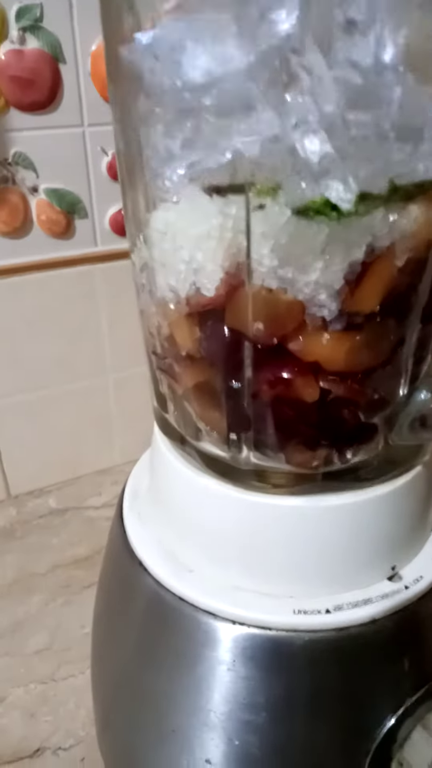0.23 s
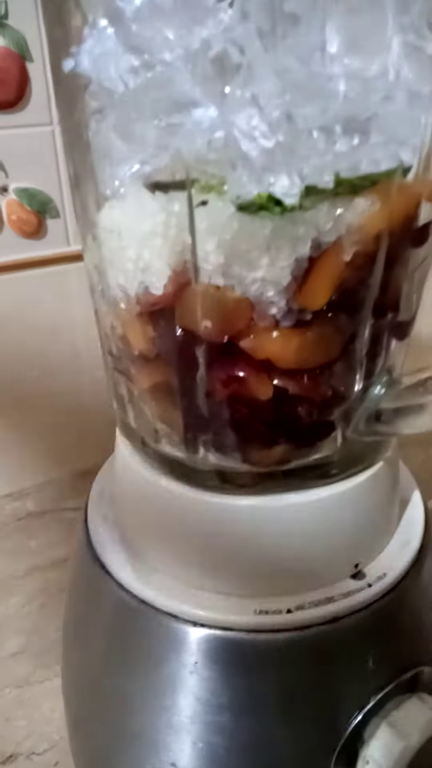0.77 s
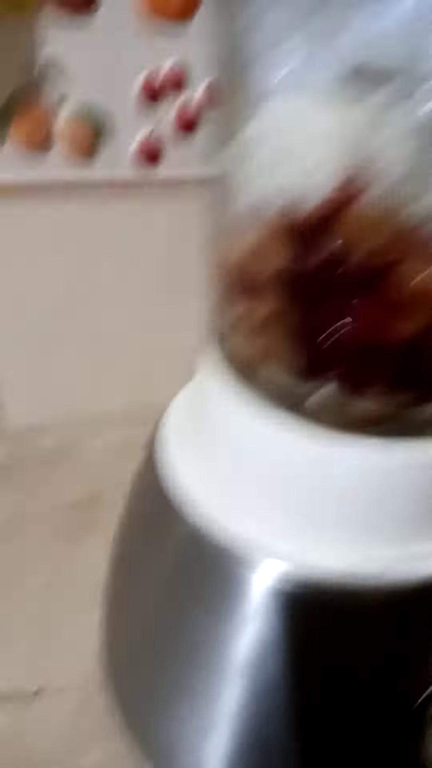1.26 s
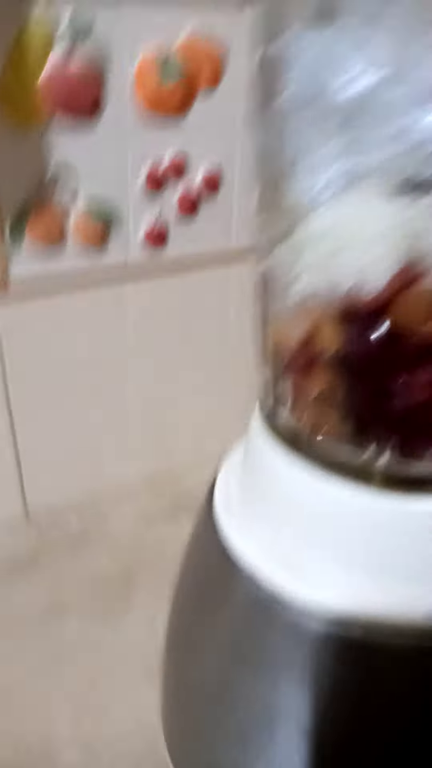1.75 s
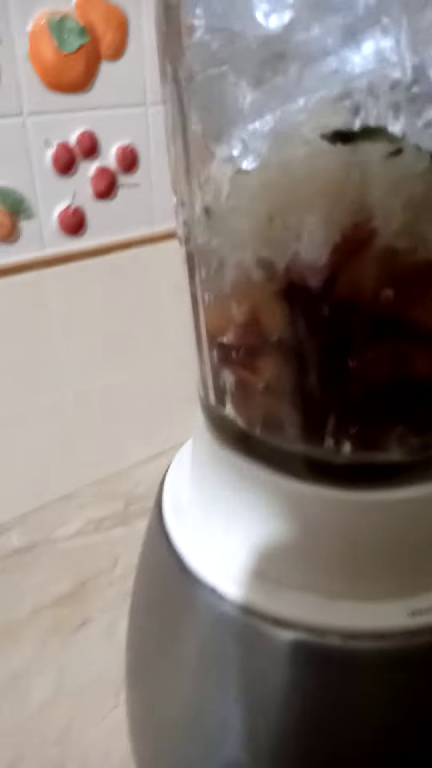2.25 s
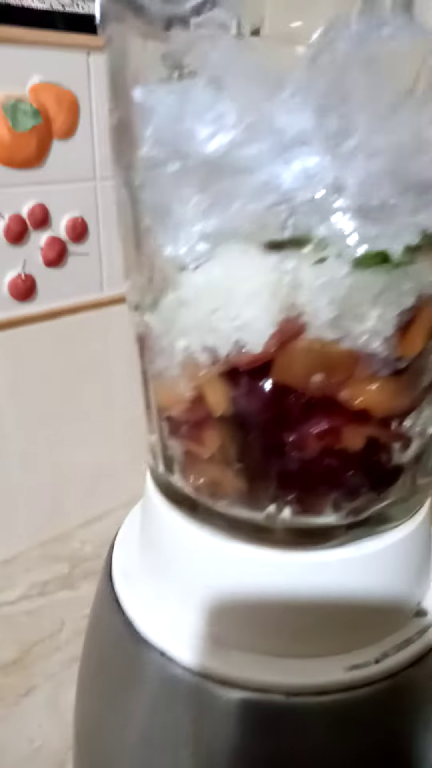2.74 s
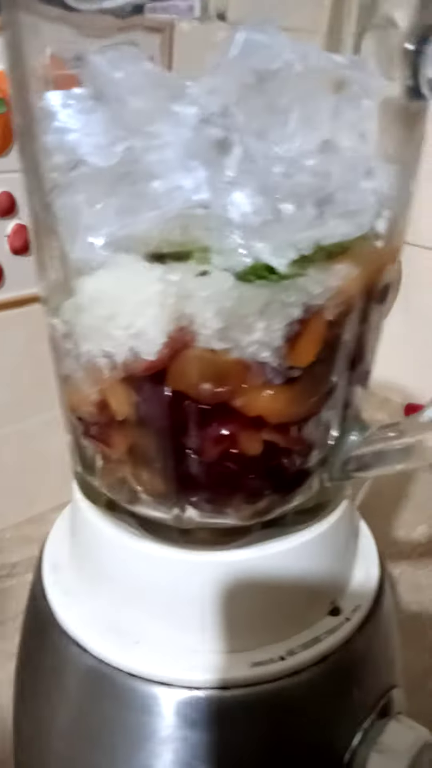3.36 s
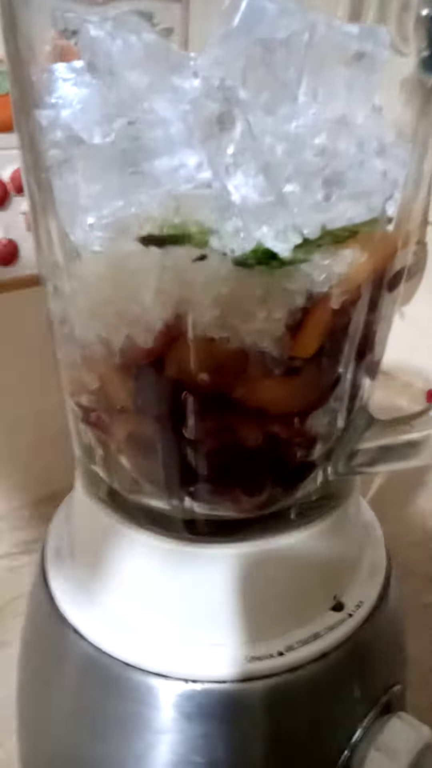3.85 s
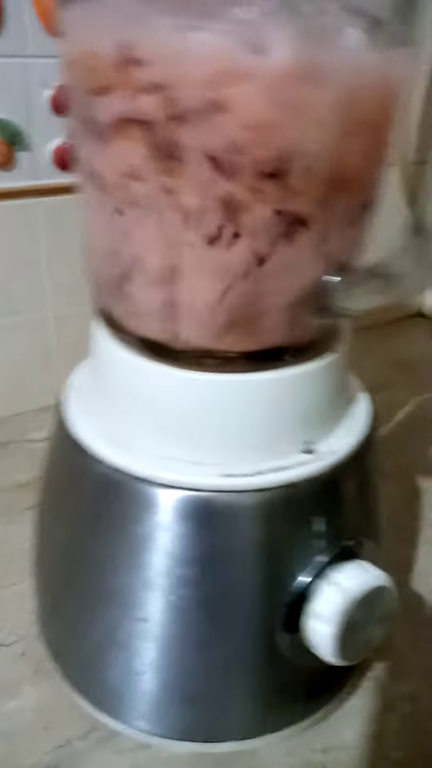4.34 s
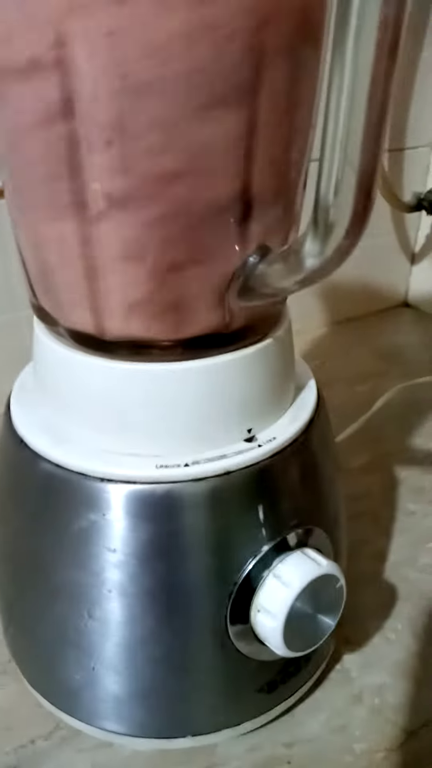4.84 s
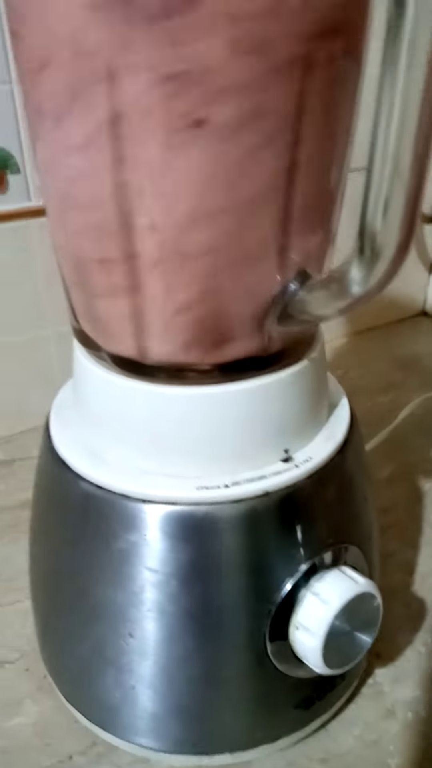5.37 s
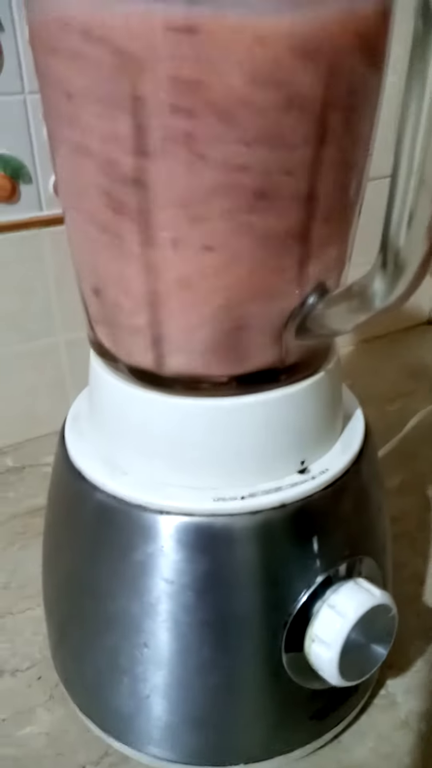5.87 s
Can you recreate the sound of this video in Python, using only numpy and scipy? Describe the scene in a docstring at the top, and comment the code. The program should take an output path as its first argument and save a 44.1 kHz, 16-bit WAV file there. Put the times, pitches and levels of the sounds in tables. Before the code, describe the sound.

A close microphone catches a short rush of ice against glass, a quiet pause, then one hard knock and a run of irregular clunks with cube rattle. A sharp double clack seats the jar and the glass rings briefly. Ice ticks settle. After a blink of total silence the blender roars steadily, a low motor hum under wet slush, gritty ice grinding and bright spray, with hard tiled-room reflections.

```python
"""A blender is loaded, closed and run in a tiled kitchen, close up. Ice slides and rattles into its glass jar
as dense and single contacts; knocks on the jar thud, crack and ring the glass, ending with one sharp clack
as it seats, then the cubes settle. After a short silent pause the blender runs: filtered grains are ice
ground into slush, sine orders of the shaft are the motor's hum. A quiet room and appliance hum lie beneath."""
import sys
import numpy as np
from scipy import signal
from scipy.fft import rfft, irfft, next_fast_len
from scipy.io import wavfile
from scipy.ndimage import map_coordinates

SR = 44100
rng = np.random.default_rng(int(sys.argv[2]) if len(sys.argv) > 2 else 0)


def dump_mix(stems):
    """Bounce the given channels to the path in sys.argv[1] as a 16-bit WAV at rate SR."""
    frames = np.atleast_2d(stems).T  # one column per channel
    limited = np.clip(frames, -1, 1)  # hard clip at full scale
    pcm = np.round(limited * 32767).astype(np.int16)
    wavfile.write(sys.argv[1], SR, pcm)


N = 269160
TIME = np.arange(N) / SR
AGE = TIME[:SR * 3 // 4]  # time since a blow
START_S = 4.039  # blender on

# ice at the blades: (time [s], grinding level [dB], blade ring level [dB])
LOAD = [(4.06, -30, -48), (4.27, -29, -35), (4.45, -27, -26), (4.52, -27.5, -38), (4.68, -29, -35),
        (4.85, -28, -24), (5.05, -24.5, -29), (5.2, -26, -26.5), (5.43, -24.5, -23.5), (5.49, -28, -28),
        (5.65, -28.5, -26.5), (5.71, -27.5, -45), (5.85, -28.5, -23), (5.97, -25, -27.5)]
# jar and base on the counter, spectrum: (frequency [Hz], level [dB])
THUD_SPECTRUM = [(50, -63.5), (80, -26.5), (129, -39.5), (168, -14.5), (257, -20.5), (380, -10), (531, -15),
                 (765, -11.5), (1080, 1.5), (1350, -6.5), (1730, -11), (1910, -16.5), (2090, -29),
                 (2250, -23), (2600, -44), (5720, -92.5)]
# hard contact, spectrum: (frequency [Hz], level [dB])
CRACK_SPECTRUM = [(1060, -32.5), (1800, 1.5), (3060, -5), (3410, 5), (4140, -7.5), (5910, -9.5),
                  (6470, 1.5), (7560, -17), (9080, -6.5), (13000, -26.5), (16000, -21)]
# snap of a tiny contact, spectrum: (frequency [Hz], level [dB])
CLICK_SPECTRUM = [(240, -63.5), (400, -18), (1900, -17.5), (2590, -8), (3420, -2), (6240, 3.5),
                  (8110, -6.5), (12700, -12.5), (15000, -6.5)]

TICK_T60_S = 0.0041  # first instant of a contact
THUMP_DB, THUMP_HZ, THUMP_WIDTH_HZ = -21, 177, 90  # a jar that is not held passes its blow to the counter
SLIDE_ATTACK_S, SLIDE_FALL_DB_PER_S = 0.017, 190


def blending():
    """Blades shatter ice grains, ring with them and throw spray; slush churns around an air funnel."""
    # lumps passing the blades: (time [s], length [s], churn swell [dB], crunch level [dB], gulp pitch [Hz])
    lump_events = [(4.311, 0.029, -40, -31, 900), (4.714, 0.017, -26, -23.5, 1060),
                   (5.377, 0.058, -32, -35, 770), (6.033, 0.024, -29.5, -37, 910)]
    # air hollows in the vortex: (start [s], length [s], top pitch before waver [Hz], level [dB])
    slurp_events = [(4.061, .3, 489, -41.5), (4.24, 0.2, 914, -39), (4.797, 0.6, 867, -40),
                    (5.068, 0.33, 1265, -42), (5.91, 0.15, 497.5, -39.5)]
    # slush spectrum: (frequency [Hz], level [dB])
    churn_spectrum = [(350, -29.5), (600, 1.5), (667, -8.5), (895, 1.5), (1080, 7), (1160, -1), (1480, 6.5),
                      (1800, -0.5), (2340, -47), (3960, -120)]
    # shattering ice spectrum: (frequency [Hz], level [dB])
    grind_spectrum = [(1000, -60.5), (1700, -9), (2500, -3.5), (2880, -3), (3170, -5.5), (3680, -7.5),
                      (4210, -6), (4580, -8), (6460, -11), (7200, -18.5), (9360, -20), (15800, -120)]
    # spray spectrum: (frequency [Hz], level [dB])
    spray_spectrum = [(4000, -21), (6800, 2.5), (7540, -11), (8190, -1.5), (9390, -1.5), (10800, -8),
                      (12700, -9.5), (13700, -10), (15100, -2.5), (16000, -8)]
    # blade resonances: (frequency [Hz], width [Hz], level [dB])
    blade_modes = [(2786, 74, 5.5), (2940, 31, 12), (3180, 360, -1)]
    grind_db, spray_db = -23, -33  # at mean load
    churn_db = -34  # between lumps
    lump_attack_s, lump_fall_db_per_s = 0.014, 260

    level_db, ring_db = curves(LOAD)
    load_db = level_db - level_db[TIME > START_S].mean()
    flutter_db = .5 * wobble(35)
    slush, shards, strikes, drops = (grains(rate, spread_db=1.5) for rate in (4000, 14000, 5000, 10000))

    # lumps add power to the churn
    lump_power = sum(amp(2 * db) * swell(s, length, lump_attack_s, lump_fall_db_per_s) ** 2
                     for s, length, db, *_ in lump_events)
    churn_gain = np.sqrt(amp(2 * churn_db) + lump_power)
    churn = churn_gain * patchy(kitchen(colour(slush, churn_spectrum), wet_db=-2.5), depth_db=1.9)
    grind_texture = patchy(kitchen(colour(shards, grind_spectrum), wet_db=-4.5), depth_db=1.1)
    grind = amp(grind_db + load_db + flutter_db) * grind_texture
    ring = amp(ring_db) * unit(resonate(strikes, blade_modes))
    # spray follows half the load in dB
    spray_texture = unit(kitchen(colour(drops, spray_spectrum), wet_db=-1.0))
    spray = amp(spray_db + .5 * load_db + flutter_db) * spray_texture
    slurp = sum(amp(db) * arch(s, length, hz) for s, length, hz, db in slurp_events)

    lumps = np.zeros(N)
    for s, length, swell_db, crunch_db, gulp_hz in lump_events:
        # the hollow a lump leaves
        gulp = unit(resonate(rng.standard_normal(N), [(gulp_hz, 94, 0)]))
        lumps += amp(swell_db - 1) * swell(s, length, lump_attack_s, lump_fall_db_per_s) * gulp
        crunch = struck(colour(burst(t60=0.22), grind_spectrum))
        body = amp(-3.5) * struck(colour(burst(t60=0.028), churn_spectrum))
        add(lumps, s, amp(crunch_db) * kitchen(crunch + body, wet_db=4))
    return churn + grind + ring + spray + slurp + lumps


def arch(s, length, top_hz):
    """A fluttering, wavering whistle: pitch and level arch as an air hollow opens and closes."""
    bend_hz_per_s2 = 1900
    off = TIME - s - length / 2
    shape = np.sqrt(np.maximum(1 - (2 * off / length) ** 2, 0))
    hz = (top_hz - bend_hz_per_s2 * off ** 2) * (1 + .012 * wobble(14))
    flutter = amp(4 * wobble(45))
    return shape * unit(flutter * np.sin(2 * np.pi * np.cumsum(hz) / SR))


def motor():
    """Sine orders of an unsteady shaft hum and whir; noise through the base and housing drones."""
    # shaft: (time [s], mean rotation [Hz], relative hum level [dB])
    shaft_curve = [(4.05, 202.3, -35), (4.35, 204.5, -42.5), (4.58, 211, -29), (4.9, 196.1, -34),
                   (5.15, 202.8, -49), (5.4, 202.4, -32), (5.8, 202, -50), (6.1, 206, -40)]
    # hum: (multiple of the shaft, relative level [dB])
    hum_orders = [(.5, 1), (1, 17.5), (2, -1)]
    # coupling whir: (multiple of the shaft, mean level [dB])
    whir_orders = [(10, -56), (13, -43.5), (14, -35), (15, -41.5)]
    # housing resonances: (frequency [Hz], width [Hz], level [dB])
    housing_modes = [(213, 32, -13.5), (500, 190, -25.5), (888, 81, -7.5), (1244, 26, -8.5), (1518, 29, -7),
                     (1900, 80, -8.5)]
    # motor base on the counter, spectrum: (frequency [Hz], level [dB])
    drone_spectrum = [(20, -36), (54, -33), (88, -16), (162, -6.5), (271, 0), (334, -15.5), (401, -2),
                      (442, -8.5), (480, -2), (653, -16), (700, -16), (910, -28), (1540, -120)]
    stagger_db = 3.5
    drone_db, drone_rise_db_per_s = -39, 1.5
    drone_follows = 0.29  # dB per dB of the shaft's hum

    shaft_hz, shaft_db = curves(shaft_curve)
    turns = np.cumsum(shaft_hz * (1 + .011 * wobble(22))) / SR
    hum = sum(amp(db + stagger_db * wobble(12)) * np.sin(2 * np.pi * k * turns) for k, db in hum_orders)

    strain_db = drone_follows * shaft_db + drone_rise_db_per_s * TIME
    drone_gain = amp(drone_db + strain_db - strain_db[TIME > START_S].mean())
    drone = drone_gain * patchy(colour(rng.standard_normal(N), drone_spectrum), depth_db=3.5)
    housing = unit(resonate(rng.standard_normal(N), housing_modes))

    # the whir follows half the blade ring in dB
    _, ring_db = curves(LOAD)
    whir = sum(amp(db + stagger_db * wobble(30)) * np.sin(2 * np.pi * k * turns) for k, db in whir_orders)
    whir *= amp(.5 * (ring_db - ring_db[TIME > START_S].mean()))
    return amp(shaft_db - 9.5) * unit(hum) + whir + drone + amp(-33.5) * housing


def knocks():
    """The jar tips against its seat and drops back with a second, weaker contact; held, it also grates."""
    # (time [s], level [dB], hardness [dB], clonk [Hz], gap to the drop back [s], clink of the ice [Hz])
    knock_events = [(1.284, -20, -10.5, 1110, 0.061, 3650), (1.485, -37.5, -36, 1200, 0.012, 3400),
                    (1.503, -33, -27.5, 1320, 0.009, 3500), (1.589, -32, -28, 1170, 0.014, 3520),
                    (1.619, -29.5, -14.5, 1180, 0.016, 3500), (1.69, -24, -15, 1260, 0.016, 3280),
                    (1.789, -25.5, -16.5, 1320, 0.009, 4000), (1.814, -34.5, -25.5, 1100, 0.013, 3500),
                    (1.863, -32, -22, 1260, 0.011, 3650), (1.897, -27, -17, 1090, 0.061, 4000),
                    (1.977, -25, -25.5, 1140, 0.01, 3900), (2.048, -22.5, -14.5, 1350, 0.021, 3950),
                    (2.127, -24.5, -13, 1214, 0.032, 2880), (2.186, -29.5, -15.5, 1170, .022, 3400),
                    (2.256, -24.5, -11.5, 1140, .018, 2800), (2.299, -28, -21.5, 1220, 0.025, 3450),
                    (2.37, -23.5, -12.5, 1197, 0.011, 4530), (2.432, -24, -6, 1160, 0.038, 4560),
                    (2.485, -33.5, -9.5, 1020, 0.009, 3460), (2.513, -25.5, 0.5, 1193, 0.016, 3400)]
    held_from_s, held_to_s = 1.45, 2.7
    out = np.zeros(N)
    for s, db, hard_db, clonk_hz, gap_s, clink_hz in knock_events:
        held = held_from_s < s < held_to_s
        add(out, s, amp(db) * knock(hard_db, clonk_hz, clink_hz, held))
        rebound_db = db - 1.5 - 39 * gap_s  # later is weaker
        add(out, s + gap_s, amp(rebound_db) * knock(hard_db - 5.5, clonk_hz, clink_hz, held))

    # the held jar grates in its seat
    grit = grains(rate=700, spread_db=4)
    grating = unit(colour(grit, THUD_SPECTRUM)) + amp(-29.5) * unit(colour(grit, CRACK_SPECTRUM))
    grating = grating * swell(1.5, 0.84, attack_s=0.076, fall_db_per_s=67.0)
    out += amp(-44.5) * kitchen(grating, wet_db=-3.5)
    return highpass(out, 85)  # too small to radiate deep bass


def knock(hard_db, clonk_hz, clink_hz, held):
    """One contact thuds, clonks, cracks, rings the glass and throws a cube at it; harder is brighter."""
    thud = struck(colour(burst(t60=0.041), THUD_SPECTRUM))
    if not held:
        thud += amp(THUMP_DB) * struck(resonate(burst(t60=0.04), [(THUMP_HZ, THUMP_WIDTH_HZ, 0)]))
    seat = [(clonk_hz, 190, 0)]
    clonk = amp(-2.8) * struck(resonate(resonate(burst(t60=0.019), seat), seat))
    crack = amp(hard_db + 2.5) * struck(colour(burst(t60=0.075), CRACK_SPECTRUM))
    cube = [(clink_hz, 340, 0)]
    clink = amp(hard_db + 1.5) * struck(resonate(resonate(burst(t60=0.036), cube), cube))
    blow = jolt(kitchen(thud + clonk + crack + clink, wet_db=-5.5), rattle_db=-4.5)
    tick = amp(hard_db - 13.5) * struck(colour(burst(t60=TICK_T60_S), CLICK_SPECTRUM))
    ring = glass(-2.5 + 0.29 * hard_db, hard_db - 0.5, held)
    rise = 1 - np.exp(-AGE / .0005)
    return blow + tick + kitchen(rise * ring, wet_db=-7.5)


def jolt(blow, rattle_db):
    """A blow and its weaker repeats, as shaken cubes rattle back against the wall."""
    rattle = grains(rate=230, spread_db=10.0, size=len(AGE)) * amp(-60 * AGE / 0.072) * (AGE > .004)
    rattle /= np.sqrt(np.sum(rattle ** 2) + 1e-9)
    return blow + amp(rattle_db) * signal.fftconvolve(blow, rattle)[:len(AGE)]


def glass(ring_db, hard_db, held=False, seated=False):
    """Decaying mode pairs of the wall; hardness drives the high ones, ice on a held jar detunes them."""
    # (frequency [Hz], level [dB], free t60 [s], extra while held [dB], extra when struck from the seat [dB])
    wall_modes = [(1906, -12, 0.38, 4.5, -6), (2306, -15, 0.3, 9, 7.5), (2850, -7.5, 0.052, 8, 12),
                  (3400, -1, 0.11, 7, -9), (3700, 4.5, 0.18, -3, -0.5), (4410, -13, 0.12, 7.5, 13),
                  (4800, -6.5, 0.051, 7, -16.5), (5490, 4.5, 0.12, 1, -17), (6510, -9.5, 0.11, 0.5, 9),
                  (6420, -3.5, 0.17, -2, 5.5), (7130, -12, 0.07, 9.5, -16), (10400, -16.5, 0.06, 3.5, 3.5)]
    hand_damping = 1.88  # a hand divides t60 by this
    blur_hz = 25
    out = 0
    draws = rng.uniform(-0.82, 1, (len(wall_modes), 2, 3))
    for (hz, db, t60, held_db, seat_db), pair in zip(wall_modes, draws):
        blow_db = np.interp(hz, [4500, 4900], [ring_db, hard_db])
        life_s = t60 / hand_damping if held else t60
        stray_hz, scatter_db = (.018 * hz, 6) if held else (1.8 / life_s, 2)
        # leaning cubes chafe the wall: phase drifts
        blur = held * np.cumsum(rng.standard_normal(len(AGE))) * np.sqrt(2 * np.pi * blur_hz / SR)
        mode_db = db + held * held_db + seated * seat_db + blow_db
        decay = amp(mode_db - 60 * AGE / life_s) / np.sqrt(2)
        for level, detune, phase in pair:
            angle = 2 * np.pi * (hz + stray_hz * detune) * AGE + np.pi * phase + blur
            out += decay * amp(scatter_db * level) * np.sin(angle)
    return out


def clack():
    """The jar snaps into its seat and rocks once more: short, hard blows; the free glass rings on."""
    # seat resonances, applied twice: (frequency [Hz], width per pass [Hz], level per pass [dB])
    seat_modes = [(860, 840, -13.5), (1370, 1200, 0.5), (2500, 670, -2)]
    clack_s, rock_s = 2.7945, 2.819
    out = np.zeros(N)
    for s, db in (clack_s, -20), (rock_s, -27):
        snap = struck(resonate(resonate(burst(t60=0.013), seat_modes), seat_modes))
        snap += amp(0.5) * struck(colour(burst(t60=0.018), CRACK_SPECTRUM))
        thud = amp(-3.0) * struck(colour(burst(t60=0.054), THUD_SPECTRUM))
        thump = struck(resonate(burst(t60=0.043), [(THUMP_HZ, THUMP_WIDTH_HZ, 0)]))
        thud += amp(THUMP_DB + 3.0) * thump
        ring = (1 - np.exp(-AGE / 0.00055)) * glass(ring_db=-3.5, hard_db=-3.5, seated=True)
        add(out, s, amp(db) * kitchen(snap + thud + ring, wet_db=-5))
    add(out, clack_s, amp(-25.0) * struck(colour(burst(t60=TICK_T60_S), CLICK_SPECTRUM)))
    return highpass(out, 120)  # too small to radiate deep bass


def ice():
    """Cubes slide as a rush of tiny contacts; single ones click, each at its own pitch; a faint hiss joins."""
    # rubbing cubes, spectrum: (frequency [Hz], level [dB])
    rub_spectrum = [(180, -21), (379, -9.5), (480, -19), (667, -24.5), (1080, 0.5), (1600, -8), (2650, 0),
                    (4020, -8), (4670, -2), (6400, -7.5), (9710, -10.5), (13300, -26), (15200, -13.5)]
    # heap slides, poured then settling: (start [s], length [s], level [dB])
    slide_events = [(0, 0.11, -32.5), (0.129, 0.03, -30.5), (0.241, 0.055, -38.5), (0.338, 0.045, -39.5),
                    (2.888, 0.11, -48), (3.16, 0.046, -49.5), (3.662, 0.14, -61.5)]
    # single cubes: (time [s], level [dB], pitch [Hz])
    click_events = [(0.0044, -18.5, 2520), (0.1395, -18, 4450), (0.1517, -21.5, 4640), (0.3406, -23, 5280),
                    (2.9816, -26.5, 4100), (3.111, -34.5, 1150), (3.2178, -34, 6400), (3.246, -29.5, 6500),
                    (3.277, -26.5, 5600), (3.285, -30, 6100), (3.313, -25, 2200), (3.43, -40.5, 2900)]
    # hiss band: (frequency [Hz], width [Hz], level [dB])
    hiss_modes = [(15100, 1500, 0)]

    contacts = grains(rate=6000, spread_db=3)
    slide = patchy(kitchen(colour(contacts, rub_spectrum), wet_db=-6.5), depth_db=3.0)
    out = slide * np.max([amp(db) * swell(s, length, SLIDE_ATTACK_S, SLIDE_FALL_DB_PER_S)
                          for s, length, db in slide_events], axis=0)
    # faint, dense, high hiss near 15 kHz from the clack on, dying away
    hiss = unit(resonate(grains(rate=800, spread_db=4), hiss_modes))
    out += amp(-56.5) * swell(2.795, 0.52, SLIDE_ATTACK_S, SLIDE_FALL_DB_PER_S) * hiss
    for s, db, hz in click_events:
        snap = amp(-14) * struck(colour(burst(t60=0.019), CLICK_SPECTRUM))
        ping = amp(-14.0) * struck(resonate(burst(t60=0.047), [(hz, 1600, 0)]))
        add(out, s, amp(db) * kitchen(snap + ping, wet_db=-3.5))
    return highpass(out, 200)  # small cubes have no bass


def whine():
    """A faint, thin, breathy tone wanders and sinks before the first knock: a noise-modulated sine."""
    start_s, length_s, start_hz, sag_hz_per_s = 0.88, 0.31, 9050, 1500
    hz = (start_hz - sag_hz_per_s * (TIME - start_s)) * (1 + .027 * wobble(14))
    breath = amp(4 * wobble(25)) * wobble(450)
    tone = unit(breath * np.sin(2 * np.pi * np.cumsum(hz) / SR))
    return amp(-76.5) * swell(start_s, length_s, SLIDE_ATTACK_S, SLIDE_FALL_DB_PER_S) * tone


def still_room():
    """Soft, filtered room noise and an appliance's wavering sine hum."""
    # still kitchen, spectrum: (frequency [Hz], level [dB])
    room_spectrum = [(25, -38), (70, -28.5), (92, -5), (130, -5.5), (230, -3), (363, -4.5), (677, -10.5),
                     (1150, -10.5), (1480, -11), (2690, -18.5), (4500, -26), (8830, -30), (12900, -42.5),
                     (16000, -29.5)]
    # appliance: (frequency [Hz], mean level [dB])
    hum_partials = [(102.3, -72), (366, -76)]
    hum = sum(amp(db + 2 * wobble(5)) * np.sin(2 * np.pi * hz * TIME + .5 * wobble(6))
              for hz, db in hum_partials)
    noise = patchy(colour(rng.standard_normal(N), room_spectrum), depth_db=2.2)
    return amp(-59 + 1.1 * wobble(4)) * noise + hum


def kitchen(x, wet_db):
    """x plus the answer of the tiled walls: a fresh noise tail, decaying by frequency."""
    # walls: (frequency [Hz], t60 [s])
    wall_t60 = [(150, 1), (1000, 0.46), (8000, 0.41), (15000, 0.23)]
    hz, t, z = signal.stft(rng.standard_normal(len(AGE)), SR, nperseg=256)
    decay = amp(-60 * t / along(wall_t60, hz)[:, None])
    tail = signal.istft(z * decay, SR, nperseg=256)[1][:len(AGE)]
    tail *= 1 - np.exp(-AGE / 0.00074)
    return x + amp(wet_db) * signal.fftconvolve(x, tail / np.linalg.norm(tail))[:len(x)]


def patchy(x, depth_db):
    """Random swells some hundred hertz wide and a tenth of a second long, rms 1."""
    z = signal.stft(x, nperseg=512)[2]
    smoother = np.outer(np.hanning(9), np.hanning(31))
    field = signal.fftconvolve(rng.standard_normal(z.shape), smoother, "same")
    return unit(signal.istft(z * amp(depth_db * unit(field)), nperseg=512)[1][:N])


def grains(rate, spread_db, size=N):
    """Random tiny impacts of uneven size, rate per second, rms 1."""
    hits = rng.random(size) < rate / SR
    return unit(hits * rng.standard_normal(size) * amp(spread_db * rng.standard_normal(size)))


def burst(t60):
    """The chatter of one contact: decaying noise."""
    return rng.standard_normal(len(AGE)) * amp(-60 * AGE / t60)


def struck(x):
    """Scale a blow to rms 1 over its first hundredth of a second."""
    return x / np.sqrt(np.mean(x[:SR // 100] ** 2) + 1e-20)


def swell(s, length, attack_s, fall_db_per_s):
    """Envelope that is up at s seconds, holds for length, then dies away."""
    attack = np.clip(1 + (TIME - s) / attack_s, 0, 1)
    return attack * amp(-fall_db_per_s * np.maximum(TIME - s - length, 0))


def wobble(rate):
    """A smooth random curve, rate knots a second."""
    return map_coordinates(rng.standard_normal(int(N * rate / SR) + 4), [TIME * rate / SR])


def colour(x, spectrum):
    """Causal minimum-phase filter with the gain of (Hz, dB) points."""
    m = 2 * next_fast_len(len(x) // 2 + 4096)
    gain = amp(along(spectrum, np.fft.rfftfreq(m, 1 / SR)))
    cepstrum = irfft(np.log(np.maximum(gain, 1e-6)))
    cepstrum[1:m // 2] *= 2
    cepstrum[m // 2 + 1:] = 0
    return irfft(rfft(x, m) * np.exp(rfft(cepstrum)), m)[:len(x)]


def resonate(x, modes):
    """x through parallel (Hz, width Hz, dB) resonances of alternating sign."""
    m = next_fast_len(len(x) + 8192)
    f = np.fft.rfftfreq(m, 1 / SR)
    gain = sum((-1) ** k * amp(db) * 1j * f * width / (hz * hz - f * f + 1j * f * width)
               for k, (hz, width, db) in enumerate(modes))
    return irfft(rfft(x, m) * gain, m)[:len(x)]


def highpass(x, hz):
    """Second-order bass cut."""
    return signal.sosfilt(signal.butter(2, hz, "highpass", fs=SR, output="sos"), x)


def amp(db):
    """Decibels to gain."""
    return 10 ** (np.asarray(db) / 20)


def unit(x):
    """Scale to rms 1."""
    return x / np.sqrt(np.mean(x ** 2) + 1e-20)


def along(points, hz):
    """(Hz, value) points read on a log axis."""
    f, v = np.transpose(points)
    return np.interp(np.log(hz + 1), np.log(f + 1), v)


def curves(rows):
    """One value per sample for each column after the time."""
    s, *cols = np.transpose(rows)
    return [np.interp(TIME, s, c) for c in cols]


def add(track, s, sound):
    """Mix a sound in at s seconds."""
    i = max(round(s * SR), 0)
    track[i:i + len(sound)] += sound[:N - i]


def scene():
    """Ice, knocks and the clack, then the running blender, alike in both channels."""
    blender = (TIME >= START_S) * (blending() + motor())
    mono = blender + knocks() + clack() + ice() + whine() + still_room()
    return np.array([mono, mono])


def record(dry):
    """The microphone rounds off peaks, loses deep bass and ends at its band limit; the pause is muted."""
    mute_from_s, mute_to_s, top_hz = 3.883, 4.004, 15900
    live = (TIME < mute_from_s) | (TIME > mute_to_s)
    rounded = dry / (1 + (dry / .8) ** 4) ** .25
    lean = highpass(rounded, 45)
    return signal.sosfilt(signal.ellip(10, .1, 80, top_hz, fs=SR, output="sos"), lean * live)


dry = scene()
out = record(dry)
dump_mix(out)
```